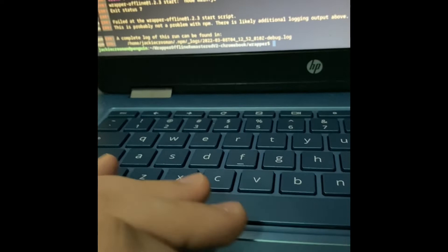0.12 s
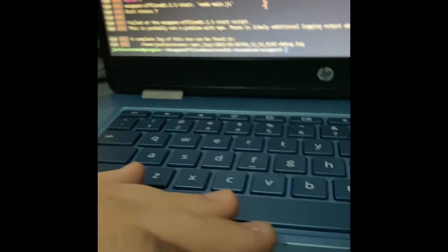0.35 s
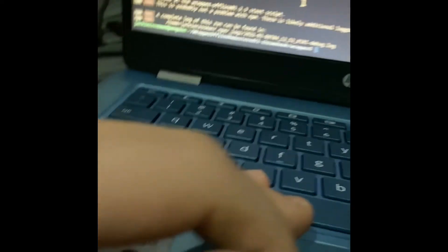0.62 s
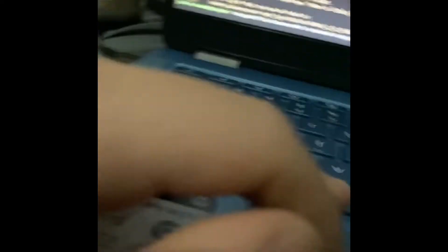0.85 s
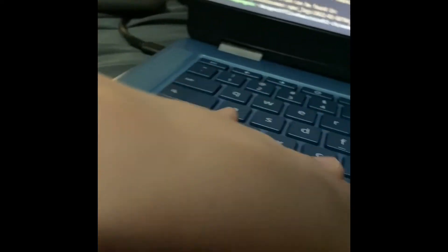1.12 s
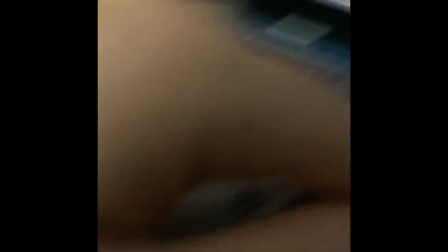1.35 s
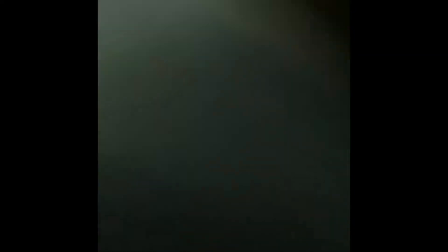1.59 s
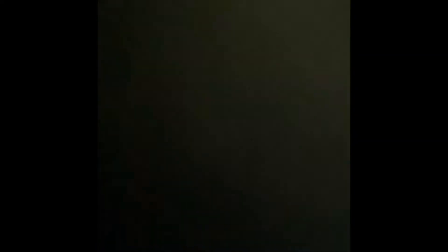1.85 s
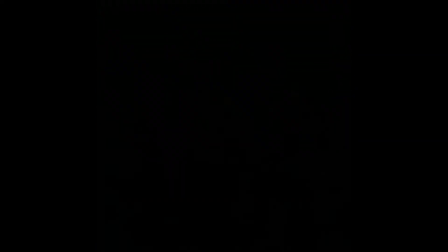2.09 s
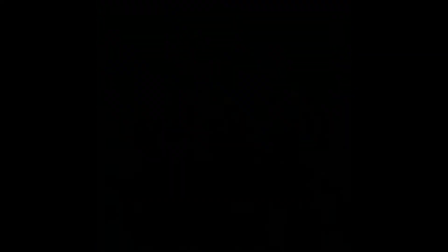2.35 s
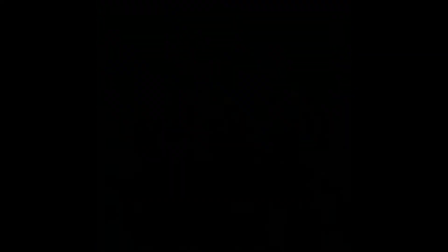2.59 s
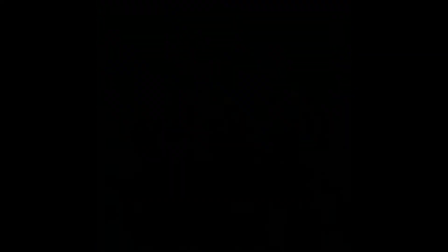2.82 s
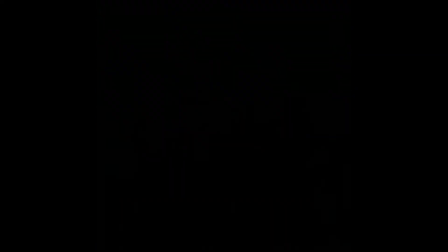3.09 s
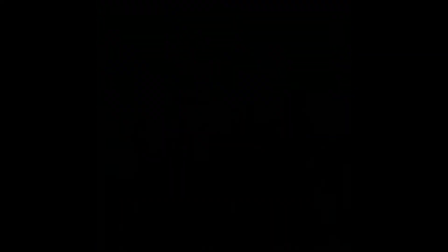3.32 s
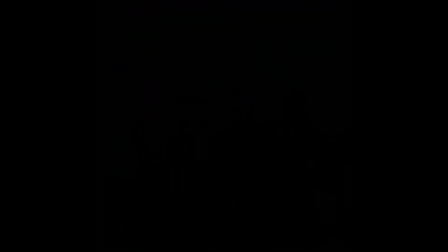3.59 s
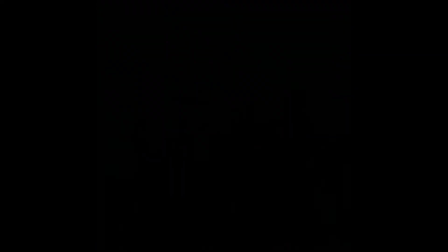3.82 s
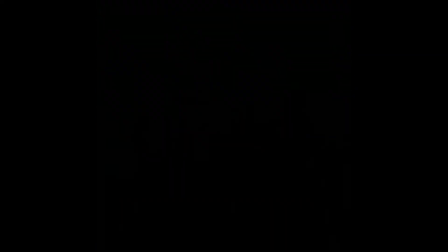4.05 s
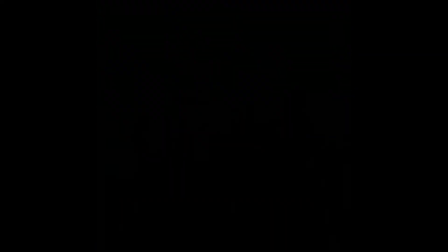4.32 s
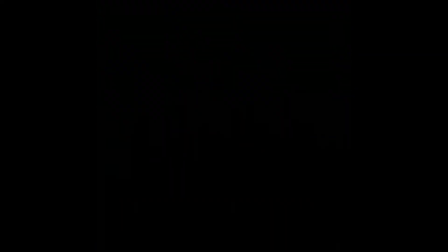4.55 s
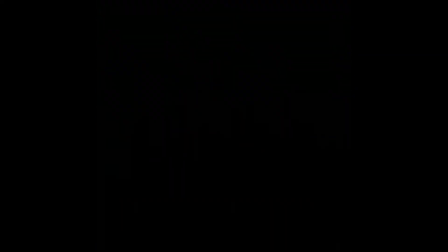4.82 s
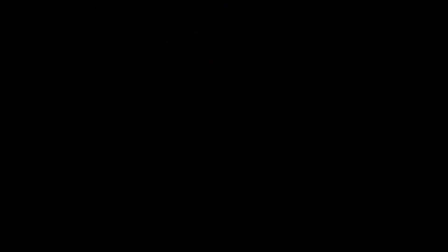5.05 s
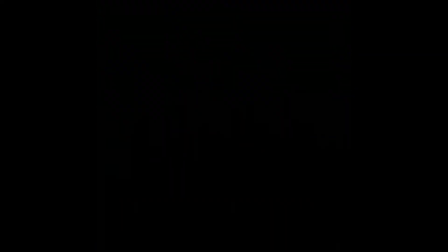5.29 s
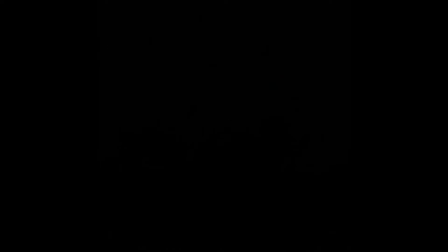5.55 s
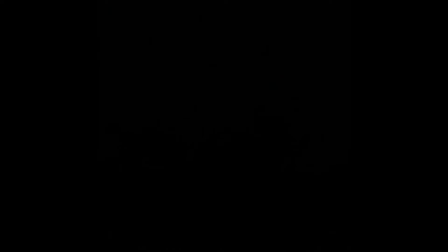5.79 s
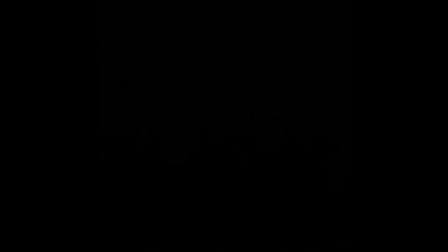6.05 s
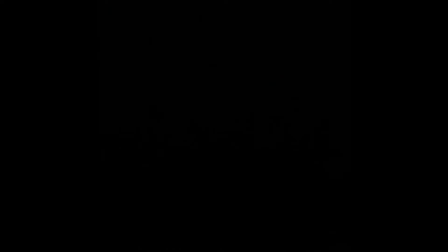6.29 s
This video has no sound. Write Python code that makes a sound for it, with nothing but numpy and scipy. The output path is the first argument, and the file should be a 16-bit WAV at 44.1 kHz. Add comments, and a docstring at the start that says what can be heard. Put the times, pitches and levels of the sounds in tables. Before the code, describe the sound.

Quiet room hum, growing fabric rustle, then one deep, boomy thud as a phone drops onto soft bedding, followed by scattered light keyboard taps.

```python
"""A faint mains hum and room rumble are heard first, with a tiny click; then cloth rustles over the two
microphone ports of a hand-held phone being laid face down on soft bedding. It lands with a bouncing thump, made
of falling-pitch swells; laptop keys click nearby (short noise through resonances), and each blow arrives again
as a slow wave through the bedding. Rustle and strokes are coloured noise, the hum is a wavering sine.
All is built as mid (what the ports share) and side (how they differ); low sound is alike up to a drifting corner."""
import sys
import numpy as np
from scipy import signal
from scipy.fft import rfft, irfft, next_fast_len
from scipy.io import wavfile
from scipy.ndimage import map_coordinates

SR = 44100
rng = np.random.default_rng(int(sys.argv[2]) if len(sys.argv) > 2 else 0)


def level_to_linear(level):
    """Convert decibel levels to linear amplitude factors, elementwise."""
    exponent = np.asarray(level, float) / 20
    return 10 ** exponent


def store_pcm(level_fs):
    """Save levels as 16-bit WAV."""
    pcm = np.round(np.clip(level_fs, -1, 1) * 32767).astype(np.int16)
    wavfile.write(sys.argv[1], SR, np.atleast_2d(pcm).T)


N = 282725  # length in samples


def unit(x):
    """Scaled to rms 1."""
    return x / np.sqrt(np.mean(x ** 2) + 1e-20)


def along(points, hz):
    """(Hz, value) points read on a log frequency axis."""
    point_hz, value = np.transpose(points)
    return np.interp(np.log(hz + 1), np.log(point_hz + 1), value)


def curves(rows, t=None):
    """Each column after the time, joined by straight lines and read at times t (every sample by default)."""
    seconds, *columns = np.transpose(rows)
    if t is None:
        t = np.arange(N) / SR
    return [np.interp(t, seconds, column) for column in columns]


def wobble(rate):
    """A smooth random curve, with rate random knots a second."""
    knots = rng.standard_normal(int(N * rate / SR) + 4)
    return map_coordinates(knots, [np.arange(N) * rate / SR])


def filtered(x, response):
    """x shaped by a response, real or complex, that is a function of frequency in Hz."""
    m = next_fast_len(N + SR // 2)
    spectrum = rfft(x, m) * response(np.fft.rfftfreq(m, 1 / SR))
    return irfft(spectrum, m)[..., :N]


def noise(spectrum):
    """Coloured noise of rms 1."""
    white = rng.standard_normal(N)
    return unit(filtered(white, lambda hz: level_to_linear(along(spectrum, hz))))


def pair(spectrum):
    """Unrelated coloured noises for mid and side."""
    return np.array([noise(spectrum), noise(spectrum)])


def resonant(modes):
    """Response of a few resonances, rung by a blow; neighbours have opposite signs."""
    def response(hz):
        total = 0
        for k, (centre, width, db) in enumerate(modes):
            ring = 1j * hz * width / (centre ** 2 - hz ** 2 + 1j * hz * width)
            total = total + (-1) ** k * level_to_linear(db) * ring
        return total
    return response


# The phone lands and bounces. Each row: start in seconds, level of the swell in dB, time to its peak in ms,
# pitch at the peak in Hz, sharpness of the swell (no unit).
BOUNCES = [(1.689, -24.5, 47.2, 59.4, 9), (1.751, -30.5, 33.4, 81.5, 5.5), (1.8662, 0.4, 17.5, 70.8, 2.3),
           (1.9192, -2.5, 19, 67.5, 5), (1.981, -4.5, 19.6, 81.4, 5.4), (2.0269, -14.5, 22.4, 66.3, 6.6),
           (2.0594, -22, 14.1, 60.8, 2), (2.098, -21, 12.6, 49, 1.8), (2.1387, -23, 18, 50.3, 2.6),
           (2.215, -28.5, 10.0, 55.4, 0.88)]


def blows():
    """Every bounce and key sends a quick rap and a slow wave; rows as BOUNCES plus the share of pitch to fall."""
    landings = [(*row, 0.691) for row in BOUNCES]
    key_waves = [(s + 0.0087, wave_db, 32.5, 74.8, 5.5, 0.42) for s, *_, wave_db in KEY_CLICKS]
    # a rap starts 16.94 ms before the peak of its landing, and 17 dB under it
    raps = [(s + ms / 1000 - 0.01694, db - 17, 216.5) for s, db, ms, *_ in BOUNCES]
    # a key's rap is -40.5 dB for a -42 dB click, and grows slower than the click
    raps += [(s, -40.5 + 0.49 * (db + 42), 178) for s, db, *_ in KEY_CLICKS]
    return landings + key_waves + [(s, db, 9.34, hz, 2.7, 0.504) for s, db, hz in raps]


# Colour of the loose shudder and of the deep sway. Each row: frequency in Hz, relative strength in dB per Hz.
DEEP_COLOUR = [(15, -18), (45, 2.5), (75, 7), (110, 10.5), (200, -56)]


def thuds():
    """Bedding carries fast waves sooner than slow ones, so every blow swells while its pitch falls;
    a crunch of stuffing runs ahead of it and a loose shudder follows."""
    out = np.zeros((3, N + SR))
    t = np.arange(SR // 3) / SR
    for s, db, peak_ms, hz, sharp, sweep in blows():
        peak_s = peak_ms / 1000
        u = t / peak_s
        # cycles so far; the pitch passes hz at the peak
        turn = hz * ((1 - sweep) * t + sweep * (peak_s + .002) * np.log(1 + t / .002))
        wave = (u * np.exp(1 - u)) ** sharp * np.sin(2 * np.pi * turn)
        crunch = level_to_linear(-17.5) * t / 0.0066 * np.exp(1 - t / 0.0068)
        shudder = level_to_linear(-25.0 - 60 * t / 0.31) * (1 - np.exp(-u ** 2))
        out[:, round(s * SR):][:, :len(t)] += level_to_linear(db) * np.array([wave, crunch, shudder])
    wave, crunch, shudder = out[:, :N]
    crunch = crunch * noise([(100, 11.0), (300, 6.0), (650, -9.5), (1300, -24.5), (4000, -44.5)])
    return wave + crunch + shudder * noise(DEEP_COLOUR)


# Strokes of cloth on the ports. Each row: start of the hold in seconds, hold in seconds, level in dB,
# rise in ms per 10 dB, fall in ms per 10 dB.
CLOTH_STROKES = [(0, 0.0095, -77, 50, 517), (0.727, 0.1, -78.5, 55, 25.5), (1.112, .005, -67.5, 2, 260),
                 (1.316, .005, -62, 59, 300), (1.406, 0.023, -58.5, 58, 76), (1.495, 0.15, -62.5, 100, 100),
                 (1.711, 0.0022, -48.5, 42, 38), (1.834, .002, -47.5, 67, 9.5),
                 (1.873, 0.046, -53, 24.5, 21.5), (1.982, 0.0017, -58, 37.5, 81),
                 (2.09, .002, -63, 62, 114.5), (2.2, .002, -69.5, 100, 197), (4.97, .002, -74, 100, 81),
                 (6.41, .002, -61, 59, 50)]


def rubbing():
    """Strength of the cloth: every stroke rises, holds and falls; the strongest is heard."""
    t = np.arange(N) / SR
    strokes = []
    for s, hold, db, rise, fall in CLOTH_STROKES:
        before = np.maximum(s - t, 0) / rise
        after = np.maximum(t - s - hold, 0) / fall
        strokes.append(db - 10000 * (before + after))
    return level_to_linear(np.max(strokes, axis=0))


# The ports are muffled as the phone sinks in. Each row: time in seconds, gain of the top treble in dB.
BRIGHTNESS = [(.6, 0.5), (.72, 13.5), (1.15, 6), (1.5, 13), (1.85, 4.5), (2.1, 4), (2.4, -17), (6.41, -6.5)]
# Colour of the rustle. Each row: frequency in Hz, relative strength in dB per Hz.
RUSTLE_COLOUR = [(400, -26.5), (750, -1.5), (1200, -8.5), (1450, -5), (2500, -8), (4500, -15),
                 (6500, -15.5), (9000, -15), (15600, -26.5), (15900, -70)]


def cloth():
    """Fibres slip over the ports in fine grains: noise with a quickly wavering level and changing treble."""
    bright_db, = curves(BRIGHTNESS)
    strength = rubbing() + level_to_linear(-95.5)  # never quite at rest
    grain = strength * level_to_linear(1.58 * wobble(55) + 0.87 * wobble(450))
    rub = pair(RUSTLE_COLOUR)
    top = filtered(rub, lambda hz: 1 / (1 + (7500 / (hz + 1)) ** 12))  # above about 7500 Hz
    return grain * (rub - top + level_to_linear(bright_db) * top)


# Key and case clicks. Each row: time in seconds, level of the click in dB, then knock of the case and thin upper
# ring, both in dB relative to the click, and level of the slow wave in the bedding in dB.
KEY_CLICKS = [(0.3376, -62, -19, -11, -63), (1.8678, -49, 31.5, -18.5, -60), (2.0162, -41.5, 12, -7, -60),
              (2.2296, -39, 7.5, -22, -25.5), (2.4634, -60.5, 3, -2, -34), (2.77, -33, 3, -21, -39.5),
              (2.8697, -53, 4, -4.5, -53.5), (4.097, -60.5, -7, -6, -40), (4.206, -61.5, -2, -7, -57),
              (4.585, -59, -25, -15, -58), (4.5955, -41, -11.5, -17.5, -39), (5.445, -62, -18, -6.5, -29),
              (5.541, -69.5, 8, -2.5, -47), (5.7983, -44.5, -14, -17.5, -32.5),
              (5.875, -61.5, -10, -11.5, -45.5), (6.0033, -66, -6, -9, -53), (6.0087, -45, -9, -26, -40),
              (6.0968, -68.5, -5, -7, -53), (6.281, -43.5, -5, -14, -40.5), (6.35, -58.5, 4.5, -15, -54)]
# Low ring of a key cap. Each row: frequency in Hz, width in Hz, level in dB.
CAP_LOW = [(1440, 200, -6.5), (1870, 270, -7.5), (2530, 215, -0.5)]
# Thin upper ring of a key cap. Each row: frequency in Hz, width in Hz, level in dB.
CAP_HIGH = [(3550, 400, -2), (4530, 370, 3), (6000, 1000, -5.5), (9200, 1900, -2.5), (11760, 1300, -3.5)]
# The laptop case under a key. Each row: frequency in Hz, width in Hz, level in dB.
CASE_RING = [(330, 104, 4), (655, 93, 9), (1160, 520, -12.5)]
# Colour of the finger's scuff. Each row: frequency in Hz, relative strength in dB per Hz.
SCUFF_COLOUR = [(600, -31.5), (2600, -4.5), (3400, -8), (4800, -5), (9000, -26), (15800, -24)]


def clicks():
    """A short gritty contact rings cap and case; a scuff of the finger trails it. Returns mid and side."""
    low, top = np.zeros((2, 2, N + SR))
    case, scuff = np.zeros((2, N + SR))
    t = np.arange(SR // 5) / SR
    contact = (t / .0012 * np.exp(1 - t / 0.001)) ** 2  # the fingertip presses on gradually
    for s, db, knock_db, top_db, _ in KEY_CLICKS:
        scuff_db = -14 + 0.52 * top_db  # glancing blows ring thin and scuff more
        start = round((s - .0005) * SR)
        at = slice(start, start + len(t))
        grit = rng.standard_normal((3, len(t))) * contact
        grit = grit / np.linalg.norm(grit, axis=1, keepdims=True)
        ears = level_to_linear(db + 30.5) * (0.86 * grit[0] + grit[1:])  # partly alike at the two ports
        low[:, at] += ears
        top[:, at] += level_to_linear(top_db) * ears
        case[at] += level_to_linear(db + knock_db + 30.5) * grit[0]
        scuff[at] += level_to_linear(db + scuff_db - 60 * t / 0.25) * (1 - np.exp(-t / 0.0015))
    left, right = filtered(low[:, :N], resonant(CAP_LOW)) + filtered(top[:, :N], resonant(CAP_HIGH))
    knock = filtered(case[:N], resonant(CASE_RING))
    rings = np.array([(left + right) / 2 + knock, (left - right) / 2 + level_to_linear(-10.0) * knock])
    return rings + scuff[:N] * level_to_linear(2.3 * wobble(150)) * pair(SCUFF_COLOUR)


# Rumble and hum slip from mid into side and nearly return. Each row: time in seconds, depth from 0 to 1.
SLIP_DEPTH = [(.54, 0), (.6, 0.5), (.75, 0.83), (.85, 0.71), (.88, 0.26), (1.15, 0.08)]


def slip():
    """Gains in dB of mid and side while the low sound slips across."""
    depth = np.clip(curves(SLIP_DEPTH)[0], 0, 1)
    return np.array([-27 * depth, 13.5 * np.sqrt(depth)])


# The phone in the room. Each row: time in seconds, deep sway in mid in dB, rumble in side in dB,
# corner in Hz up to which mid swells, corner in Hz up to which side is hushed.
PHONE_IN_ROOM = [(0, -69, -61, 30, 30), (.5, -59.5, -62.5, 30, 30), (.78, -71, -59.5, 29.6, 30),
                 (.95, -62, -62.5, 670, 115), (1.42, -63, -48.5, 1250, 804), (1.7, -54, -70.5, 1246, 805),
                 (2.4, -59, -70.5, 813.3, 710), (3.3, -74.5, -72, 788, 734), (3.8, -69, -70.5, 535, 504),
                 (4.8, -66, -66.5, 258, 231), (5.15, -74.5, -70.5, 60.4, 60), (6.41, -59, -66, 40, 40)]
# Steady sound in mid. Each row: time in seconds, rumble in dB, mains hum in dB.
STEADY_LOWS = [(0, -60, -59), (.55, -59, -55), (1.3, -62.5, -50.5), (2.6, -60, -55.5), (3.3, -60.5, -57.5),
               (3.9, -63, -53), (4.4, -62.5, -60), (4.8, -60.5, -55), (5.2, -63.5, -59), (6.41, -60.5, -64)]
# The hand squeezes and the rumble swells. Each row: time in seconds, level in dB.
HAND_SQUEEZES = [(1.13, -59.5), (1.42, -55.5), (1.7, -51.5), (1.86, -58), (2.1, -63.5)]
# Colour of the room rumble. Each row: frequency in Hz, relative strength in dB per Hz.
RUMBLE_COLOUR = [(70, -28.5), (130, -8.5), (230, -2.5), (300, -9), (500, -6.5), (900, -17.5), (1500, -32.5),
                 (2500, -51.5)]
# Colour of the steady hiss. Each row: frequency in Hz, relative strength in dB per Hz.
HISS_COLOUR = [(600, -35), (1200, 3), (2600, -4.5), (3300, -14), (6000, -20), (9500, -8.5), (13200, -19),
               (13600, -32), (15800, -40)]


def room():
    """Rumble, and a floor of deep sway and steady hiss, all noise; the hand stirs sway and rumble."""
    t = np.arange(N) / SR
    deep_db, side_db, *_ = curves(PHONE_IN_ROOM)
    squeeze = sum(level_to_linear(db) * np.exp(-((t - s) / 0.064) ** 2) for s, db in HAND_SQUEEZES)
    level = np.array([level_to_linear(curves(STEADY_LOWS)[0]) + squeeze, level_to_linear(side_db)]) * level_to_linear(slip())
    rumble = level * level_to_linear(1.66 * wobble(18)) * pair(RUMBLE_COLOUR)
    sway_level = np.array([level_to_linear(deep_db) + level_to_linear(7) * rubbing(), level_to_linear(-19.5) * level[1]])
    sway = sway_level * level_to_linear(4 * wobble(8.8)) * pair(DEEP_COLOUR)
    hiss = level_to_linear([[-79], [-80]]) * pair(HISS_COLOUR)
    return rumble, sway + hiss


def hum():
    """Twice the mains frequency, wavering in strength and phase."""
    turn = 120.3 * np.arange(N) / SR + 0.054 * wobble(3.0)
    level_db = np.array([curves(STEADY_LOWS)[1], np.full(N, -85)]) + slip()
    return np.sqrt(2) * level_to_linear(level_db + 2.0 * wobble(7.4)) * np.sin(2 * np.pi * turn)


def below_corner(x, gain_db, column):
    """x with everything under a drifting corner (a column of PHONE_IN_ROOM) changed by gain_db."""
    hz, t, z = signal.stft(x, SR, nperseg=2048)
    corner_hz = curves(PHONE_IN_ROOM, t)[column]
    below = 1 / (1 + (hz[:, None] / corner_hz) ** 24)
    return signal.istft(z * level_to_linear(gain_db * below), SR, nperseg=2048)[1][:N]


# The two ports cancel some treble in mid. Each row: frequency in Hz, gain in dB.
MID_GAIN = [(5800, 0.5), (6900, -11.5), (7400, -14), (8800, -12), (12000, -8), (13000, -16.5),
            (14100, -19.5), (14600, -4.5)]
# And in side. Each row: frequency in Hz, gain in dB.
SIDE_GAIN = [(4000, -0.5), (7000, 0), (9500, -14), (10600, -36), (11800, -4.5), (13000, -7.5), (15500, 2)]


def ports(mid, side):
    """The two ports cancel some treble, differently in mid and side; returns left and right."""
    mid = filtered(mid, lambda hz: level_to_linear(along(MID_GAIN, hz)))
    side = filtered(side, lambda hz: level_to_linear(along(SIDE_GAIN, hz)))
    return np.array([mid + side, mid - side])


def scene():
    """Under the corners rumble and rustle swell in mid, while side, all layers of it, is hushed."""
    rumble, floor = room()
    gathered = rumble + cloth()
    mid, side = clicks() + floor + hum()
    mid = mid + thuds() + below_corner(gathered[0], gain_db=9.0, column=2)
    side = below_corner(side + gathered[1], gain_db=-44.5, column=3)
    return ports(mid, side)


def top_cut(x):
    """Nothing passes above the cut-off."""
    return signal.sosfilt(signal.butter(12, 16870, fs=SR, output="sos"), x)


def record(dry):
    """The loudest swings meet a soft ceiling at 0.95 of full scale."""
    soft = dry / (1 + np.abs(dry / .95) ** 8) ** (1 / 8)
    return top_cut(soft)


dry = scene()
out = record(dry)
store_pcm(out)
```